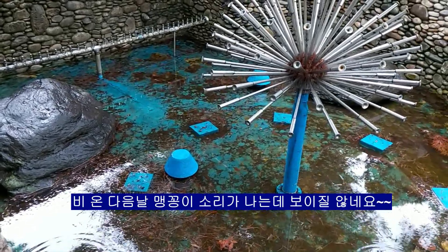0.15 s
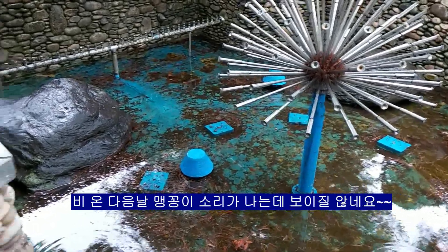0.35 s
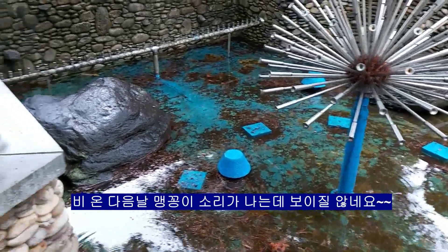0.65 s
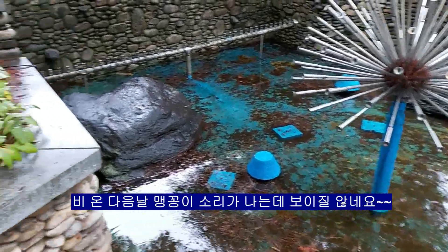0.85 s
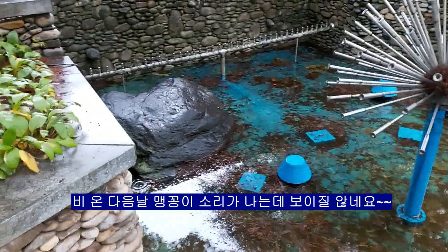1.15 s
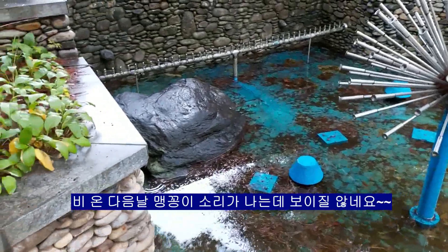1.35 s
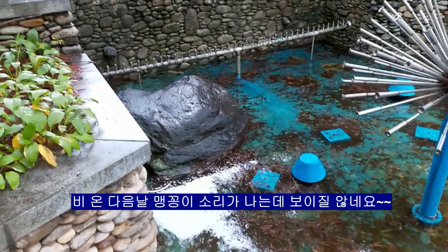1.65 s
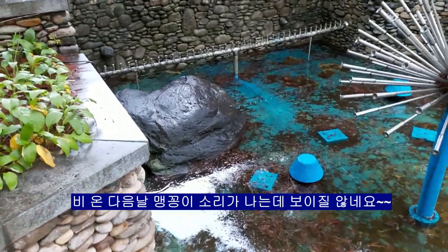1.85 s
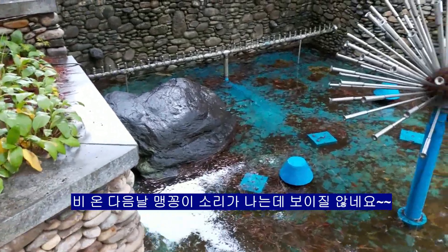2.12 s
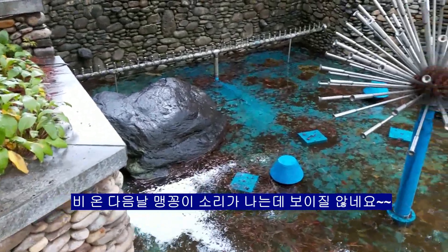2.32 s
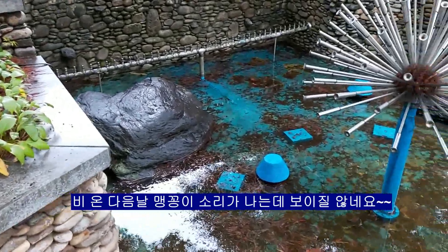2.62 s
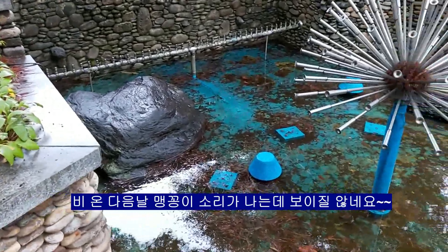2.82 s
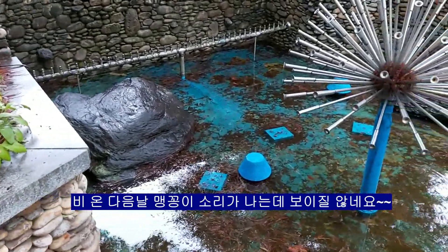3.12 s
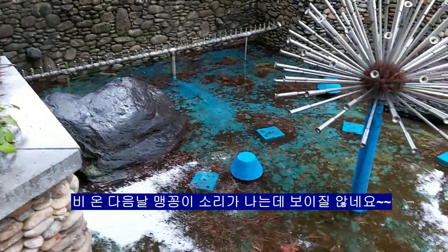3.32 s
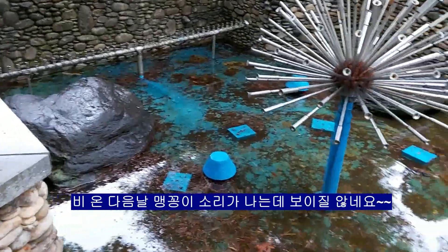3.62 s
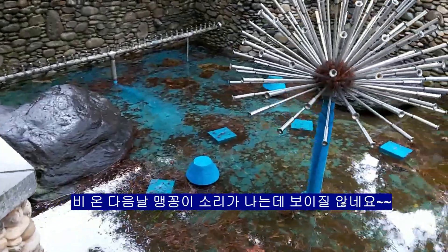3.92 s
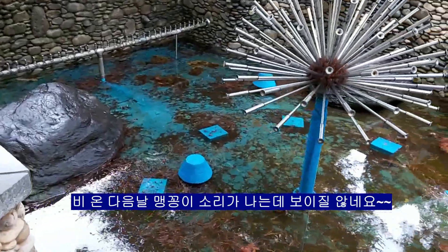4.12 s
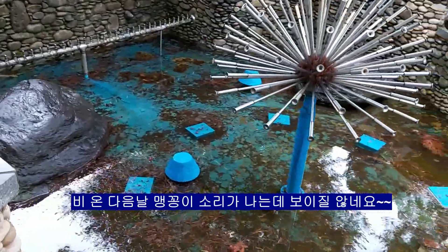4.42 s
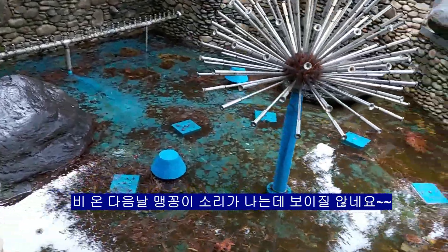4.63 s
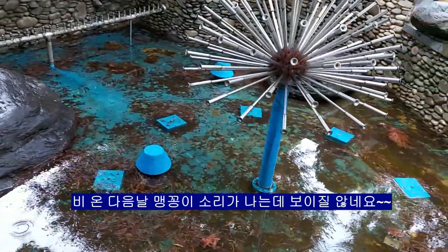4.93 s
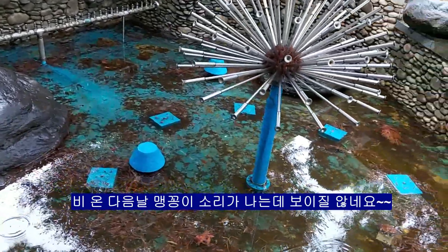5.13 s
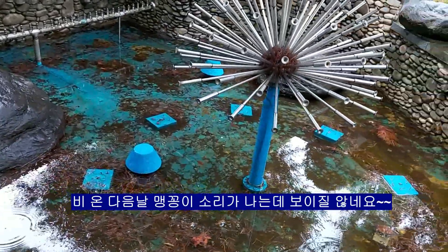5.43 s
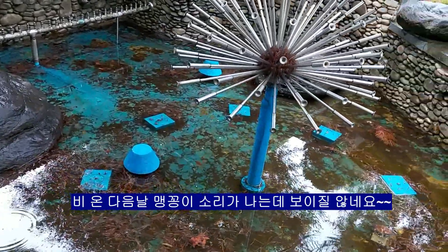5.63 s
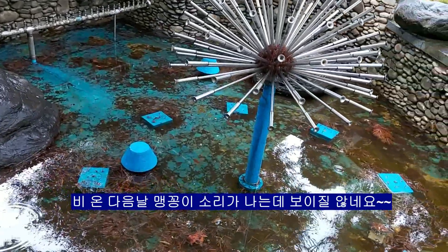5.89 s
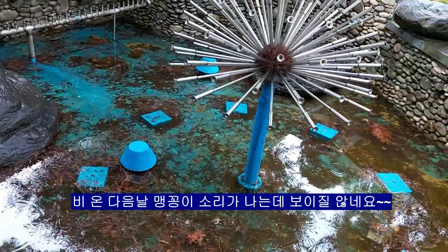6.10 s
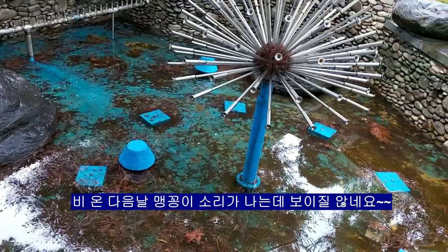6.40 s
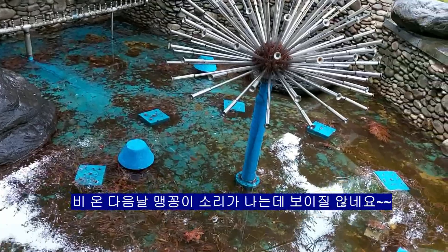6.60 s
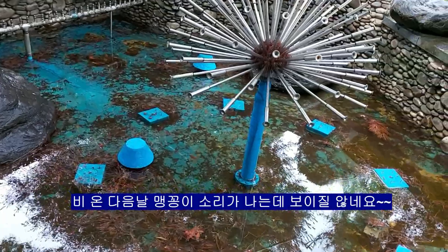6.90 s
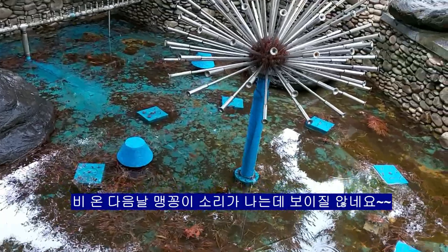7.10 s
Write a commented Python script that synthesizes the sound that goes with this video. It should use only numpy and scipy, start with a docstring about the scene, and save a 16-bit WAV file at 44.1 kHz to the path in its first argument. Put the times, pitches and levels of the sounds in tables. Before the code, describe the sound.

Narrow-mouthed toads trade short nasal buzzing croaks about twice a second in a stone-walled fountain basin, with brief wall echoes over quiet air.

```python
"""Toads in a stone basin

Three narrow-mouthed toads croak in turn around a drained, stone-walled fountain basin after rain.
Two alternate steadily; a third now and then calls over them. Each croak is a nasal buzz: harmonics
of a gliding pitch, shaped by the resonance of a swelling throat sac, that breaks off roughly.
The walls answer with scattered echoes. A faint noise hiss comes up past the middle over a low
town rumble, and there are a few noise ticks, soft grunts and low bumps on the microphone."""
import sys
import numpy as np
from scipy import signal
from scipy.fft import rfft, irfft, next_fast_len
from scipy.io import wavfile
from scipy.ndimage import map_coordinates

SR = 44100
rng = np.random.default_rng(int(sys.argv[2]) if len(sys.argv) > 2 else 0)


def int16_out(signal):
    """Quantize to a 16-bit WAV file."""
    q = np.round(np.clip(np.atleast_2d(signal).T, -1, 1) * 32767)
    wavfile.write(sys.argv[1], SR, q.astype(np.int16))


N = 319777
TIME = np.arange(N) / SR

# What the settings of each toad mean:
# TIMING: how fast the sac fills, how long its snap lasts, how long the last squeeze takes
# PITCH: scoops up to a held note, jumps as the sac snaps taut, lifts in the last squeeze
# EFFORT: swells from a soft start, pushes at the snap, changes in the last squeeze
# SAC: its resonance rises and sharpens from slack to taut, then sags and is pressed harder in
#   the last squeeze; slack_low_db changes the lowest harmonics while slack
# ROUGH (0-1): while the sac is slack, while it is taut, and what the break adds in the last break_s

# Croaks of the leading toad: (start [s], end [s], level [dB], sac resonance change [dB],
# low harmonics change [dB], left minus right [dB], share of the croak until the sac is taut [0-1])
LEAD_CROAKS = [(.035, .332, -0.5, -2, 1, -2, 0.3), (1.24, 1.537, 1, -3, 0, -2, 0.32),
               (2.39, 2.71, 0, -2.5, 1, -3.5, .42), (3.6, 3.893, 0.5, -2, 0, -3, 0.33),
               (4.72, 5.026, 0.5, -1.5, -3, -3, 0.38), (5.868, 6.166, 1, -3, -3.5, -3, 0.39),
               (6.92, 7.228, 0, -1.5, -3.5, -2.5, 0.34)]
# Colour of its voice from its hiding place, harmonics 1 to 14, before the sac shapes them:
# (left level [dB], right level [dB], phase by which left leads [rad])
LEAD_COLOUR = [(-54, -55.5, 0.5), (-29.5, -30, 0.36), (-34.5, -36.5, 0.77), (-39.5, -41.5, 0.42),
               (-44, -49.5, -2), (-37, -40, 1.01), (-37.5, -48, 1.82), (-45, -38, 3.5), (-36.5, -41, -1.83),
               (-50.5, -43, -0.5), (-44.5, -47.5, -2), (-52.5, -44.5, -2.5), (-43, -52, -2.5),
               (-58.5, -52.5, -1)]
# Its thin overtones: (start frequency [Hz], end frequency [Hz], width as random knots per second [Hz],
# level before flicker and effort [dB])
LEAD_OVERTONES = [(8700, 7000, 610, -65.5), (13200, 9200, 900, -71.5), (15500, 11800, 600, -74.5),
                  (7550, 7400, 2700, -62)]
LEAD_TIMING = dict(fill_s=0.014, settle_s=0.38, squeeze_s=0.023)
LEAD_PITCH = dict(held_hz=200.9, scoop_hz=16, scoop_s=.048, jump_hz=1.81, lift_hz=5.5)
LEAD_EFFORT = dict(soft_db=-22.5, swell_s=0.055, snap_db=2, squeeze_db=-2.5)
LEAD_SAC = dict(slack_hz=1420, slack_db=9, taut_hz=1921, taut_db=19, sag_hz=140, press_db=3,
                width_hz=590, slack_low_db=-0.5)
LEAD_ROUGH = dict(slack=0.11, taut=0.022, broken=0.41, break_s=0.038)


def leading_toad():
    """The steady first voice: its sac stays pushed after the snap and its note hardly jumps."""
    habits = (LEAD_TIMING, LEAD_PITCH, LEAD_EFFORT, LEAD_SAC, LEAD_ROUGH)
    return toad(LEAD_CROAKS, habits, LEAD_COLOUR, LEAD_OVERTONES, wet_db=-13)


# Croaks of the answering toad: (start [s], end [s], level [dB], sac resonance change [dB],
# low harmonics change [dB], left minus right [dB], share of the croak until the sac is taut [0-1])
ANSWER_CROAKS = [(.72, 1.02, -1, -0.67, -0.3, 0.064, 0.28), (1.865, 2.162, 0, -0.73, -0.62, 0.89, 0.31),
                 (3.063, 3.358, -1, -1.6, -0.77, 0.45, 0.29), (4.22, 4.514, -2, -0.22, -0.78, 0.14, 0.318),
                 (5.325, 5.625, -1.5, -0.36, 0.63, 0.55, 0.301), (6.385, 6.688, -3, 0.2, 1.5, 0, 0.327)]
# Colour of its voice from its hiding place, harmonics 1 to 14, before the sac shapes them:
# (left level [dB], right level [dB], phase by which left leads [rad])
ANSWER_COLOUR = [(-59, -58.5, 0.83), (-26, -25, 2.5), (-30, -32.5, 0.23), (-36, -33, 2.5),
                 (-35, -43.5, 0.69), (-39.5, -35.5, 3.5), (-42, -47, 1.5), (-42.5, -37, 2.5),
                 (-48, -47, 1.5), (-57.5, -49, 5), (-43, -43.5, 2.5), (-60, -53, -1.5), (-62.5, -51, 4.5),
                 (-58.5, -72, 5.5)]
# Thin overtones of the answering and third toads: (start frequency [Hz], end frequency [Hz],
# width as random knots per second [Hz], level before flicker and effort [dB])
ANSWER_OVERTONES = [(8260, 7450, 900, -57), (13000, 19000, 2500, -81.5)]
ANSWER_TIMING = dict(fill_s=0.0064, settle_s=0.038, squeeze_s=0.03624)
ANSWER_PITCH = dict(held_hz=203.77, scoop_hz=12, scoop_s=0.01626, jump_hz=8.64, lift_hz=17.9)
ANSWER_EFFORT = dict(soft_db=-23, swell_s=0.049, snap_db=4, squeeze_db=4)
ANSWER_SAC = dict(slack_hz=1250, slack_db=8.5, taut_hz=1692, taut_db=17, sag_hz=80, press_db=4,
                  width_hz=613, slack_low_db=-3)
ANSWER_ROUGH = dict(slack=0.071, taut=0.041, broken=0.28, break_s=0.026)


def answering_toad():
    """The alternating voice: a brief jump at the snap and a strong lift in the last squeeze."""
    habits = (ANSWER_TIMING, ANSWER_PITCH, ANSWER_EFFORT, ANSWER_SAC, ANSWER_ROUGH)
    return toad(ANSWER_CROAKS, habits, ANSWER_COLOUR, ANSWER_OVERTONES, wet_db=-12)


# Croaks of the third toad: (start [s], end [s], level [dB], sac resonance change [dB],
# low harmonics change [dB], left minus right [dB], share of the croak until the sac is taut [0-1])
THIRD_CROAKS = [(.63, .875, 0.51, -1, -5, 0.042, 0.57), (2.44, 2.69, 0.24, 0.5, -5, 0, 0.54),
                (5.23, 5.48, -1, -8.5, -1.5, 0.1, .52), (6.39, 6.64, -0.77, -11, -2, 0.2, 0.54)]
# Colour of its voice from its hiding place, harmonics 1 to 14, before the sac shapes them:
# (left level [dB], right level [dB], phase by which left leads [rad])
THIRD_COLOUR = [(-59.5, -56, -0.9), (-20.5, -27.5, 1.14), (-25.5, -28.5, -0.3), (-68.5, -40.5, -1.4),
                (-40, -55, -1), (-39, -41, 1.7), (-51.5, -43.5, 5), (-40, -39, 4.5), (-40, -40, -4.5),
                (-44, -39.5, 0), (-57.5, -50, 1.5), (-56.5, -62, 4.5), (-48, -50, -8.5), (-51, -67, -5)]
THIRD_TIMING = dict(fill_s=0.0048, settle_s=1, squeeze_s=0.014)
THIRD_PITCH = dict(held_hz=205.5, scoop_hz=8, scoop_s=0.03554, jump_hz=8, lift_hz=3.4)
THIRD_EFFORT = dict(soft_db=-30.5, swell_s=0.046, snap_db=1.5, squeeze_db=-0.3)
THIRD_SAC = dict(slack_hz=1370, slack_db=11.5, taut_hz=1740, taut_db=21, sag_hz=60, press_db=2.5,
                 width_hz=522, slack_low_db=-4)
THIRD_ROUGH = dict(slack=0.097, taut=.035, broken=0.27, break_s=0.02)


def third_toad():
    """The occasional voice: its sac snaps taut late, about halfway through the croak."""
    habits = (THIRD_TIMING, THIRD_PITCH, THIRD_EFFORT, THIRD_SAC, THIRD_ROUGH)
    return toad(THIRD_CROAKS, habits, THIRD_COLOUR, ANSWER_OVERTONES, wet_db=-12)


MARGIN = .04  # s computed before and after each croak


def toad(croaks, habits, colour, overtones, wet_db):
    """One toad repeats its croak from its hiding place, and the walls answer."""
    out = np.zeros((2, N))
    for start, end, db, sac_db, low_db, pan_db, taut_share in croaks:
        sound = croak(end - start, taut_share, sac_db, low_db, habits, colour, overtones)
        sound = sound * amp([[db + pan_db / 2], [db - pan_db / 2]])
        add(out, start - MARGIN, sound)
        add(out, start - MARGIN, basin(sound, wet_db))
    return out


# Weak harmonics of all voices above the 14th: (frequency [Hz], level before the sac shapes it [dB])
UPPER_HARMONICS = [(3050, -59), (3600, -57.5), (4300, -61.5), (5000, -71), (6000, -77)]


def croak(length, taut_share, sac_db, throat_db, habits, colour, overtones,
          release_s=0.0096, jitter=0.076, doubling=0.47, rasp_db=-69):
    """Vocal cords buzz through the swelling throat sac; at the end their beats turn uneven."""
    t = np.arange(int((length + 2 * MARGIN) * SR)) / SR - MARGIN
    size = len(t)
    pitch, level_db, low_db, sac_hz, height_db, sac_width_hz, rough = course(
        t, length, taut_share, *habits)
    drift = 1 + 0.0021 * wobble(52.6, size)
    cycles = np.cumsum(pitch * drift) / SR + jitter * rough * wobble(200, size)
    order = np.arange(1, 30)[:, None]
    hz = order * pitch

    # soft buzzing is dull, and the harmonics start one after another from the bottom up
    effort_db = level_db * (1 + 0.17 * np.clip((hz - 1200) / 1000, 0, 1))
    onset_s = np.clip((hz - 1300) / 20000, .01, .08)
    opening = amp(-400 * np.maximum(onset_s - t, 0))
    resonance_db = (height_db + sac_db) * np.exp(-((hz - sac_hz) / sac_width_hz) ** 2)
    lowest_db = (throat_db + low_db) * (order < 4)
    gain = opening * amp(effort_db + resonance_db + lowest_db)
    # when rough, strong and weak beats alternate, most of all in the upper harmonics
    gain *= 1 + doubling * rough * np.cos(np.pi * cycles) * np.minimum(hz / 1500, 1)

    upper_db = along(UPPER_HARMONICS, hz[len(colour):].mean(axis=1))
    upper_lead = rng.uniform(-np.pi, np.pi, len(upper_db))
    harmonics = np.vstack([colour, np.c_[upper_db, upper_db, upper_lead]])
    left_db, right_db, lead = harmonics.T[..., None]
    # each harmonic starts at its own random phase, so they do not peak together
    start_phase = rng.normal(0, 1, order.shape) * np.minimum(order / 5, 2)
    turn = 2 * np.pi * order * cycles + start_phase
    # the weak upper harmonics waver and blur
    turn += np.clip((hz - 2300) / 1500, 0, .7) * np.array([wobble(90, size) for _ in order])
    left = amp(left_db) * np.cos(turn + lead / 2)
    right = amp(right_db) * np.cos(turn - lead / 2)
    buzz = (gain * np.array([left, right])).sum(axis=1)

    # every beat also lets out a puff of rasp and excites the gliding overtones
    air = amp(rasp_db) * rng.standard_normal((2, size))
    for start_hz, end_hz, width_hz, db in overtones:
        glide_hz = start_hz + (end_hz - start_hz) * t / length
        glide = 2 * np.pi * np.cumsum(glide_hz * (1 + 0.01 * wobble(20, size))) / SR
        band = np.array([wobble(width_hz, size) * np.cos(glide) + wobble(width_hz, size) * np.sin(glide)
                         for ear in range(2)])
        air += amp(db + 2.83 * wobble(30.5, size)) * band
    air *= opening[-1] * (1 + .5 * np.cos(2 * np.pi * cycles))
    fade = np.exp(-np.maximum(t - length, 0) / release_s)
    return fade * (buzz + amp(level_db) * air)


BREAK_EDGE_S = .006  # how suddenly the voice breaks
FADE_DB, FADE_S = -5.5, 0.021  # the toad runs out of air: level lost over the last moments of a croak


def course(t, length, taut_share, timing, tune, effort, sac, rough):
    """One croak: the sac fills, snaps taut and settles, and a last squeeze breaks the voice."""
    t = np.clip(t, 0, length)
    since_taut = t - taut_share * length
    taut = step(since_taut, timing["fill_s"])
    slack = 1 - taut
    snap = taut * np.exp(-np.maximum(since_taut, 0) / timing["settle_s"])
    squeeze = np.exp((t - length) / timing["squeeze_s"])
    broken = step(t - length + rough["break_s"], BREAK_EDGE_S)

    pitch = tune["held_hz"] - tune["scoop_hz"] * np.exp(-t / tune["scoop_s"])
    pitch += tune["jump_hz"] * snap + tune["lift_hz"] * squeeze
    level_db = effort["soft_db"] * np.exp(-t / effort["swell_s"])
    level_db += effort["snap_db"] * snap + effort["squeeze_db"] * squeeze
    level_db += FADE_DB * np.clip(1 - (length - t) / FADE_S, 0, 1)
    low_db = sac["slack_low_db"] * slack
    sac_hz = sac["slack_hz"] * slack + sac["taut_hz"] * taut - sac["sag_hz"] * squeeze
    height_db = sac["slack_db"] * slack + sac["taut_db"] * taut + sac["press_db"] * squeeze
    roughness = rough["slack"] * slack + rough["taut"] * taut + rough["broken"] * broken
    return pitch, level_db, low_db, sac_hz, height_db, sac["width_hz"], roughness


# How long the stone walls ring: (frequency [Hz], time to fall 60 dB [s])
WALL_DECAY = [(200, .35), (430, 0.47), (700, 0.4), (1400, 0.32), (1850, 0.42), (2250, 0.36), (4000, 0.46),
              (12000, 0.093)]


def basin(x, wet_db, build_s=0.0042):
    """Scattered echoes off the stone walls; each frequency dies at its own speed."""
    hz, t, z = signal.stft(rng.standard_normal((2, SR // 2)), SR, nperseg=256)
    decay = amp(-60 * t / along(WALL_DECAY, hz)[:, None])
    build = 1 - np.exp(-t / build_s)
    tail = signal.istft(z * decay * build, SR, nperseg=256)[1]
    return amp(wet_db) * signal.fftconvolve(x, tail / np.linalg.norm(tail[0]), axes=1)


# Soft grunts as some croaks begin: (time [s], length [s], frequency [Hz], level of the steady part [dB])
CROAK_GRUNTS = [(.625, 0.016, 537, -54), (4.22, 0.015, 640, -61.5), (5.23, 0.02, 564, -50.5),
                (6.39, 0.02, 572, -51.5)]
# Soft bumps on the microphone: (time [s], length [s], frequency [Hz], level of the steady part [dB])
MICROPHONE_BUMPS = [(0.653, 0.0099, 120.6, -49), (1.297, 0.018, 138.7, -45), (1.838, .025, 135, -55),
                    (1.902, 0.027, 115.4, -48), (3.682, 0.013, 125, -48), (4.512, 0.041, 114, -54),
                    (4.95, 0.16, 55.9, -53), (5.727, 0.054, 100, -55.5), (6.73, 0.078, 107.5, -50.5),
                    (6.796, 0.077, 54.15, -40.5)]


def grunts_and_bumps():
    """Short soft swells of a wavering low tone, equal in both channels."""
    out = np.zeros(N)
    for s, length, hz, db in CROAK_GRUNTS + MICROPHONE_BUMPS:
        turn = 2 * np.pi * hz * TIME
        swell = np.exp(-((TIME - s) / length) ** 2)
        out += amp(db) * swell * (np.cos(turn) + 1.22 * wobble(hz / 2, N) * np.sin(turn))
    return out


# Small ticks: (time [s], level before the common gain [dB])
TICK_TIMES = [(0.5724, -54.5), (0.639, -46.5), (1.8886, -42), (3.266, -42), (3.6284, -50.5), (4.136, -54)]


def ticks(t60=0.069, gain_db=-6):
    """Small dry ticks, perhaps drips on stone: noise that dies away by 60 dB in t60 seconds."""
    out, t = np.zeros((2, N)), np.arange(SR // 8) / SR
    for s, db in TICK_TIMES:
        add(out, s, amp(db + gain_db - 60 * t / t60) * rng.standard_normal((2, len(t))))
    return out


# Spectrum of the faint hiss: (frequency [Hz], relative level [dB])
HISS_SPECTRUM = [(300, 14), (1500, 15), (3000, 10), (4700, 11), (7000, 7), (12500, -1), (15000, -35.5)]
# the hiss fades in up to its peak, then sinks slowly
HISS_PEAK_S, HISS_DB, HISS_RISE_DB_PER_S, HISS_SINK_DB_PER_S = 4.7, -54, 32, 2


def hiss():
    """A faint wide hiss of coloured noise that swells and sinks."""
    since_peak = TIME - HISS_PEAK_S
    hiss_db = HISS_DB + np.minimum(HISS_RISE_DB_PER_S * since_peak, -HISS_SINK_DB_PER_S * since_peak)
    return amp(hiss_db) * noise(HISS_SPECTRUM, side=1.0)


# Spectrum of the town rumble: (frequency [Hz], relative level [dB])
RUMBLE_SPECTRUM = [(20, -34.5), (38, -26), (54, -3.5), (70, -8.5), (110, -13), (200, -21.5), (500, -33.5),
                   (1200, -36), (3000, -45), (15000, -50.5)]


def rumble():
    """Distant town rumble: low, nearly central noise whose level wavers."""
    return amp(-58 + wobble(8.5, N)) * noise(RUMBLE_SPECTRUM, side=0.11)


def noise(colour, side):
    """Coloured stereo noise of rms 1; side sets its width."""
    a, b = filtered(rng.standard_normal((2, N)), lambda hz: amp(along(colour, hz)))
    return unit(np.array([a + side * b, a - side * b]))


def amp(db):
    """Decibels to amplitude."""
    return 10 ** (np.asarray(db) / 20)


def unit(x):
    """Scale to rms 1."""
    return x / np.sqrt(np.mean(x ** 2) + 1e-20)


def along(points, hz):
    """Interpolate (frequency [Hz], value) points on a log axis."""
    f, v = np.transpose(points)
    return np.interp(np.log(hz + 1), np.log(f + 1), v)


def wobble(rate, size):
    """A smooth random curve, rate knots a second."""
    knots = rng.standard_normal(int(size * rate / SR) + 4)
    return map_coordinates(knots, [np.arange(size) * rate / SR])


def step(t, width):
    """A smooth rise from 0 to 1 around t = 0."""
    return .5 + .5 * np.tanh(t / (2 * width))


def filtered(x, response):
    """Multiply the spectrum of x by a response of frequency."""
    m = next_fast_len(N + SR // 2)
    return irfft(rfft(x, m) * response(np.fft.rfftfreq(m, 1 / SR)), m)[..., :N]


def add(track, s, sound):
    """Mix a stereo sound into the track at time s."""
    part = track[:, max(0, round(s * SR)):][:, :sound.shape[-1]]
    part += sound[..., :part.shape[-1]]


def scene():
    """Three toads in the basin, with small noises and the background."""
    toads = leading_toad() + answering_toad() + third_toad()
    return toads + grunts_and_bumps() + ticks() + hiss() + rumble()


TOP_HZ = 15400  # band limit of the recorder


def record(dry):
    """The recorder keeps nothing above its band limit."""
    return filtered(dry, lambda hz: hz < TOP_HZ)


dry = scene()
out = record(dry)
int16_out(out)
```